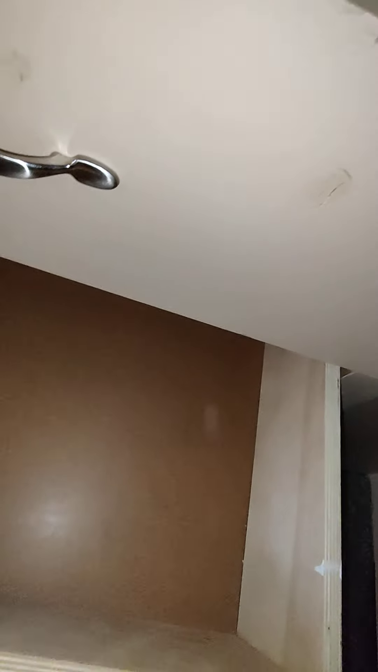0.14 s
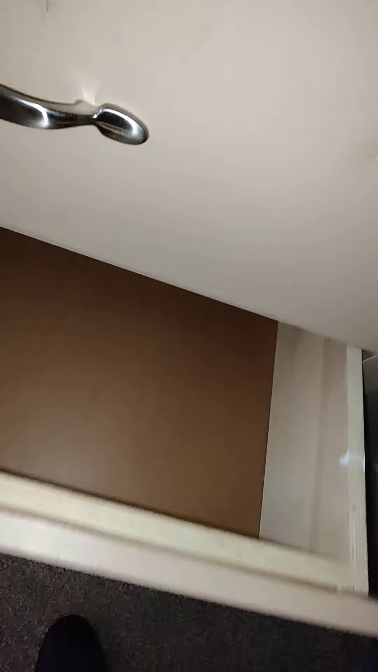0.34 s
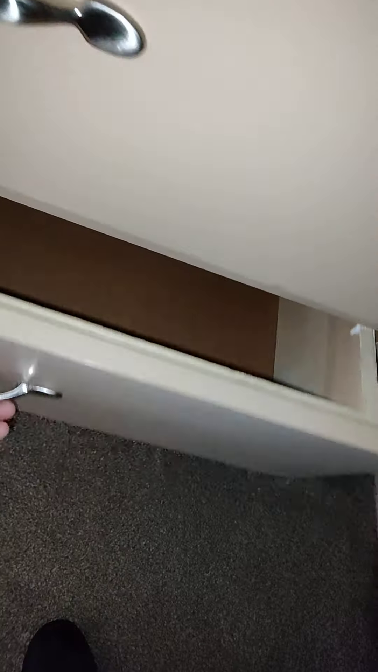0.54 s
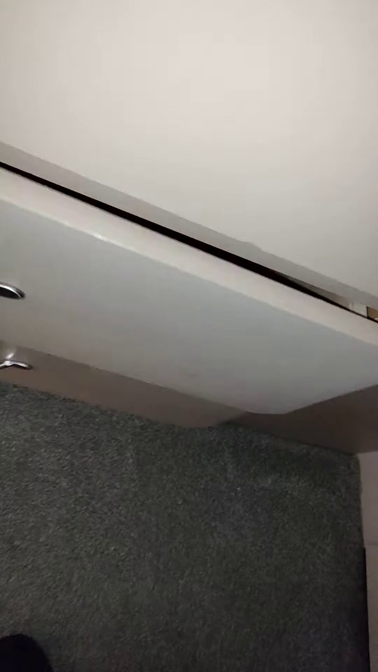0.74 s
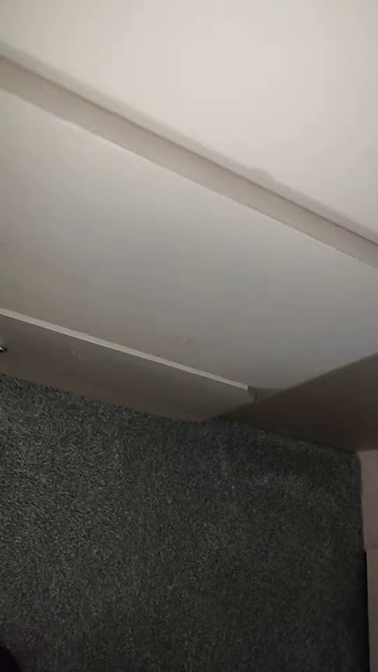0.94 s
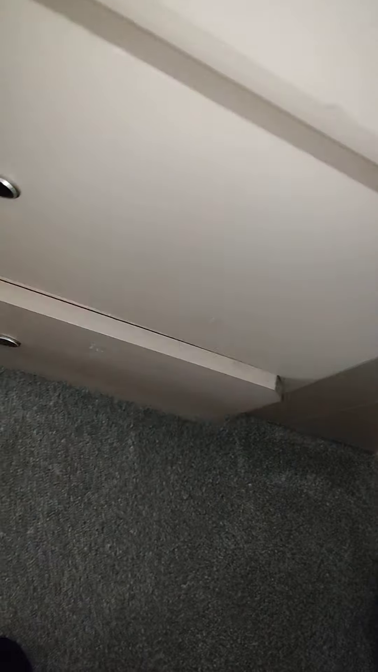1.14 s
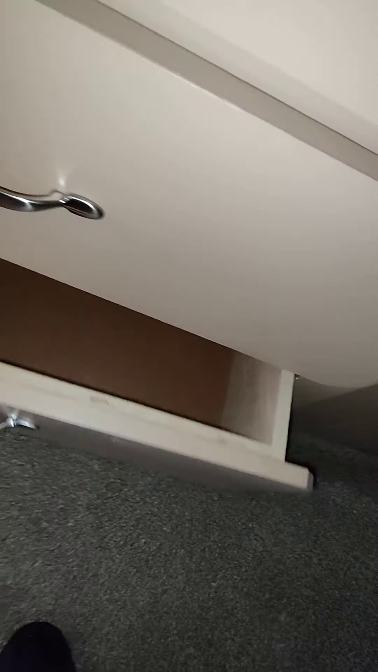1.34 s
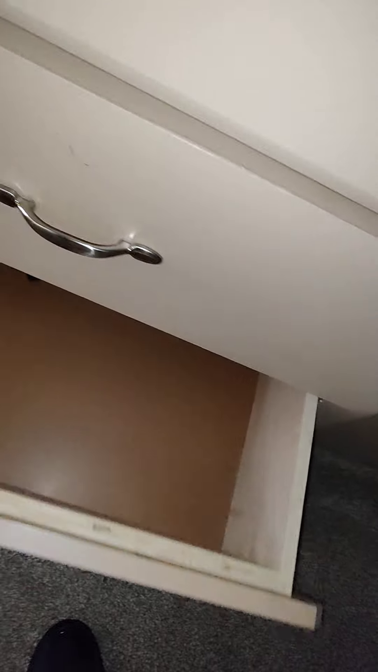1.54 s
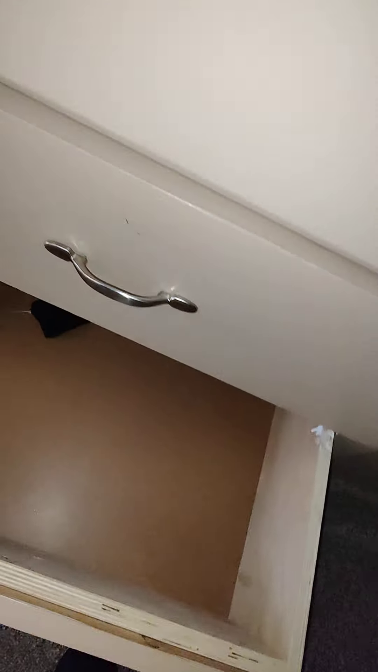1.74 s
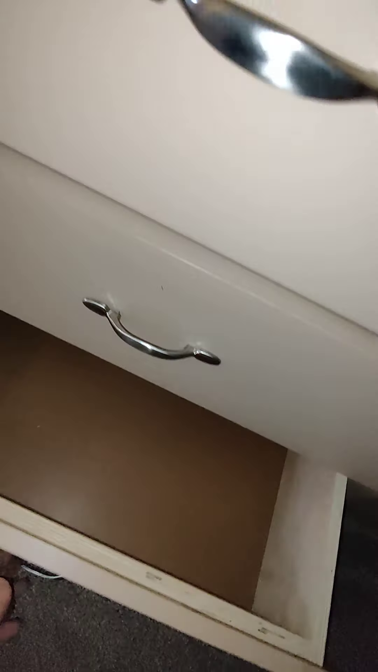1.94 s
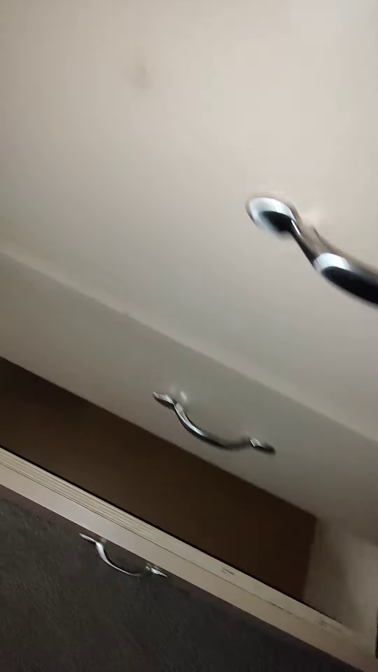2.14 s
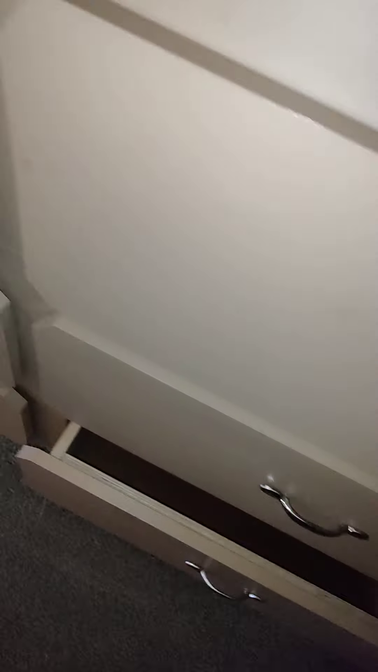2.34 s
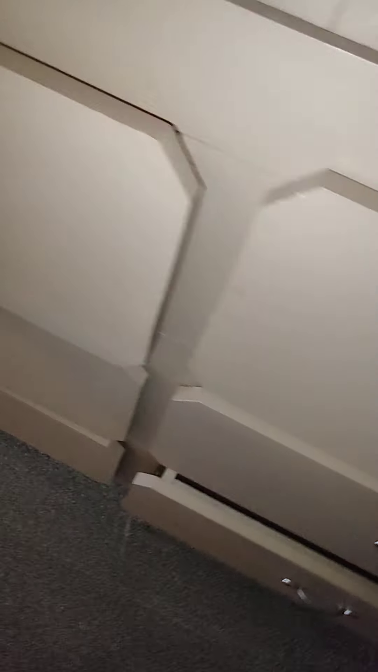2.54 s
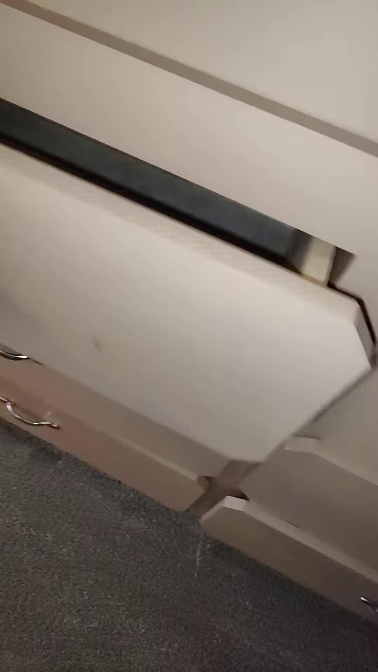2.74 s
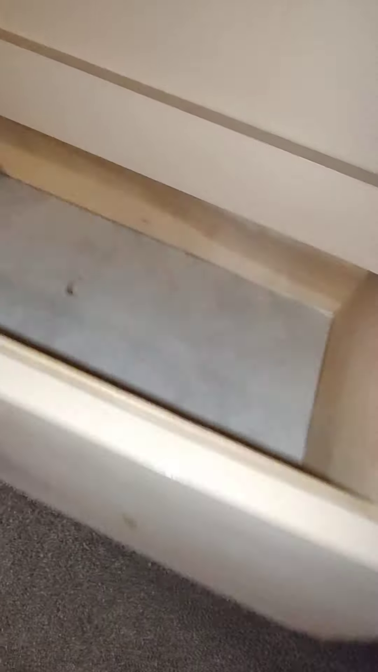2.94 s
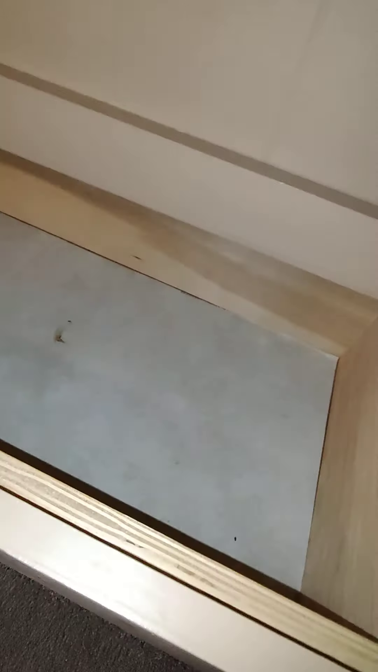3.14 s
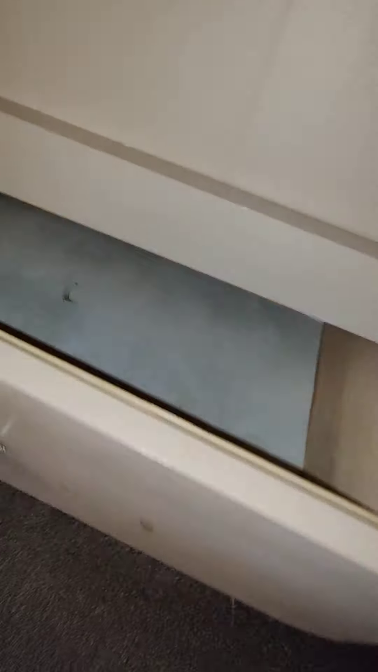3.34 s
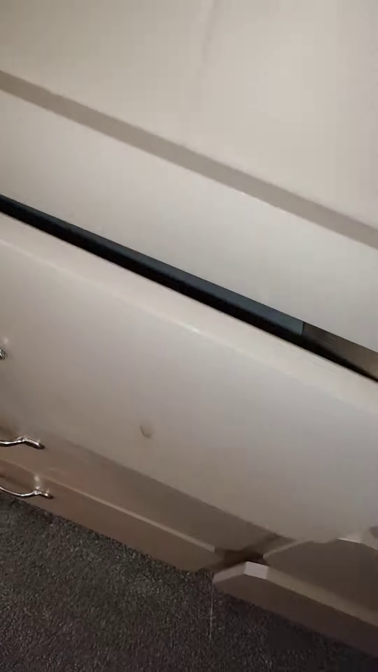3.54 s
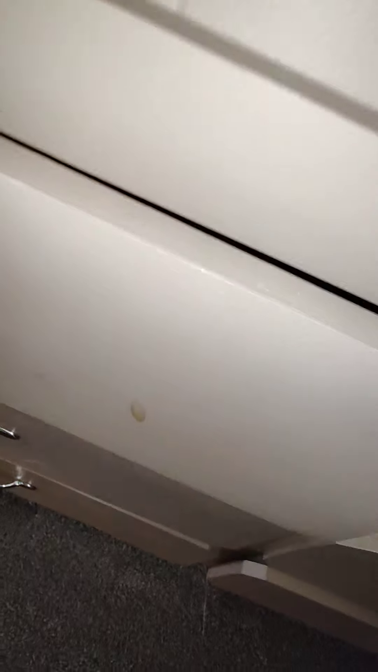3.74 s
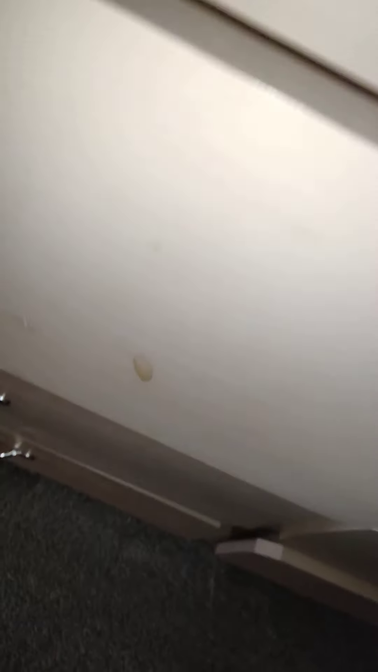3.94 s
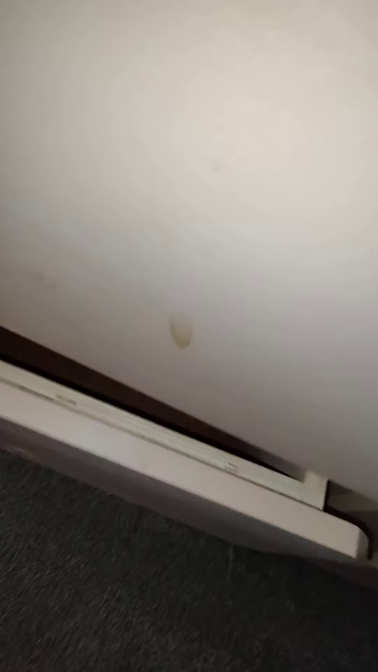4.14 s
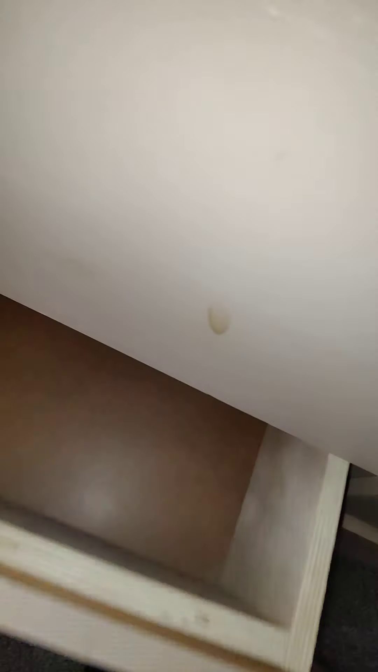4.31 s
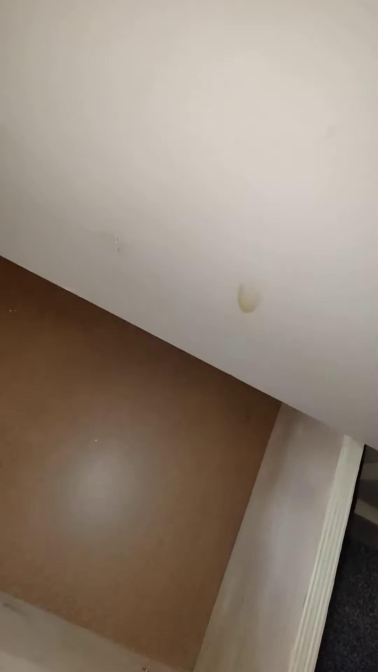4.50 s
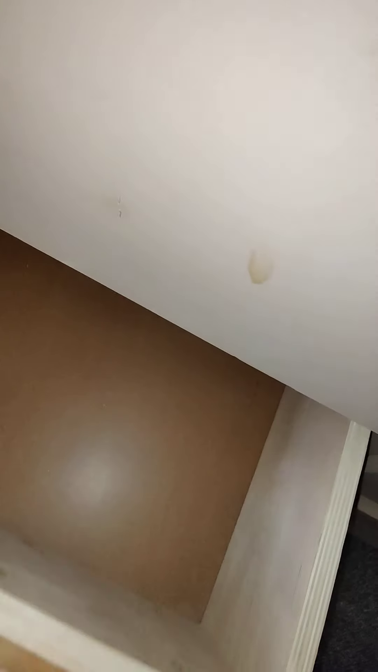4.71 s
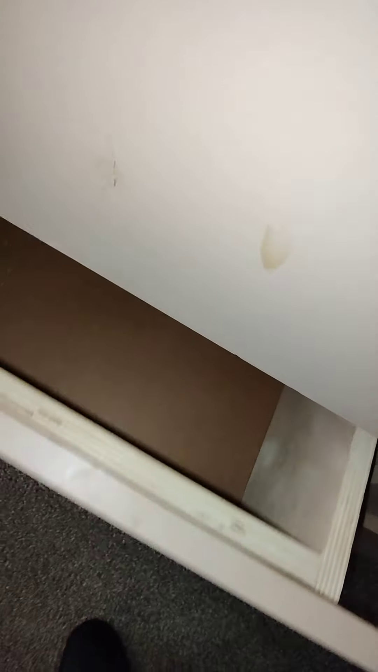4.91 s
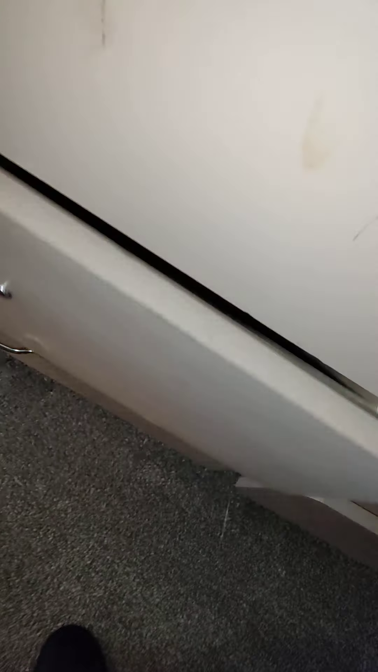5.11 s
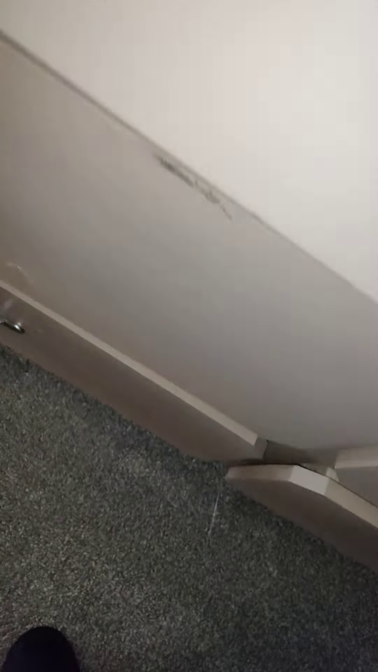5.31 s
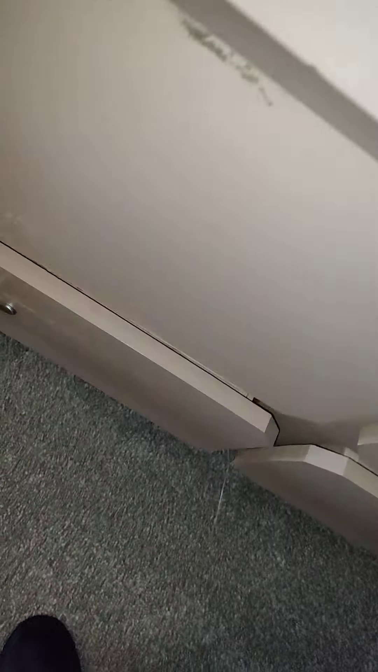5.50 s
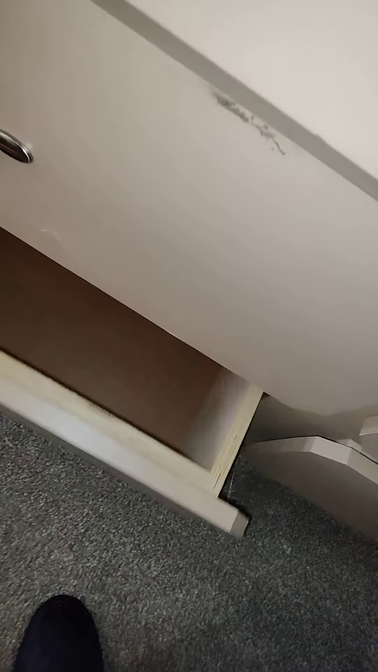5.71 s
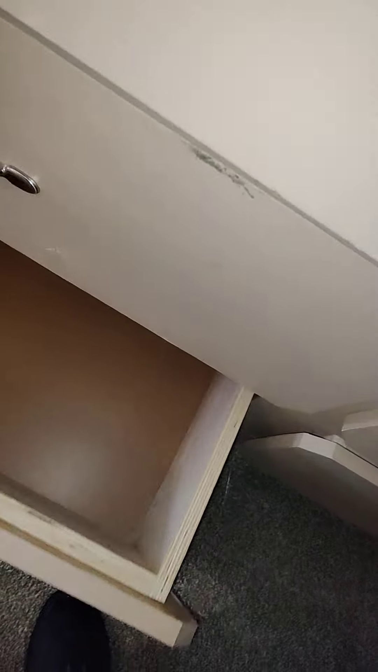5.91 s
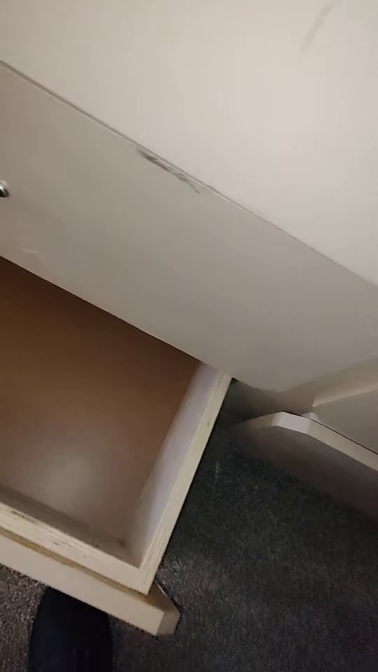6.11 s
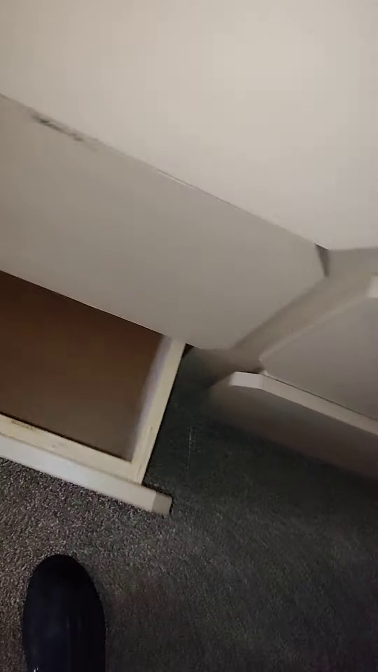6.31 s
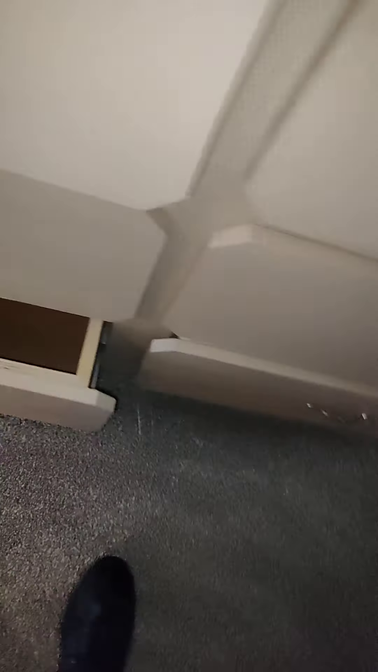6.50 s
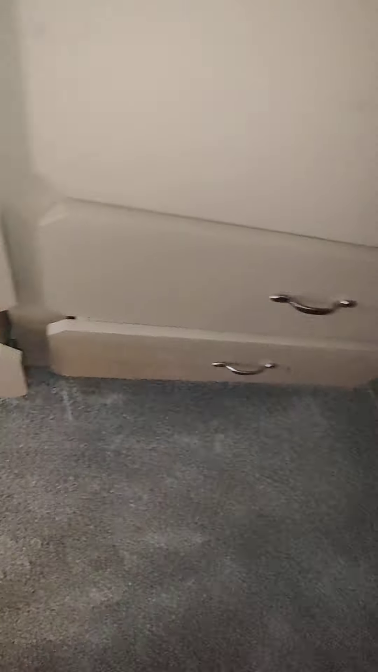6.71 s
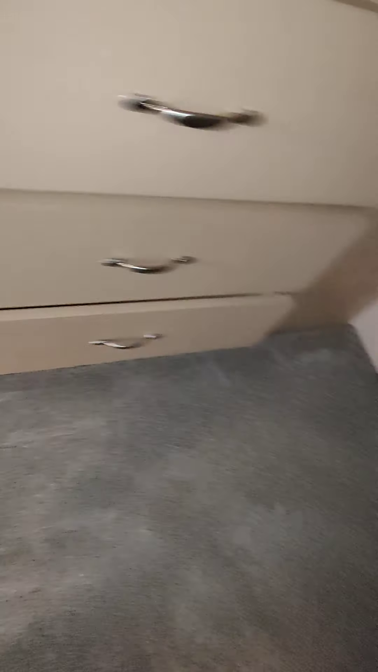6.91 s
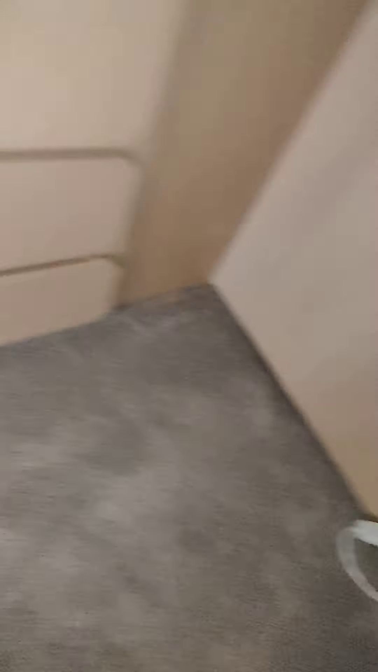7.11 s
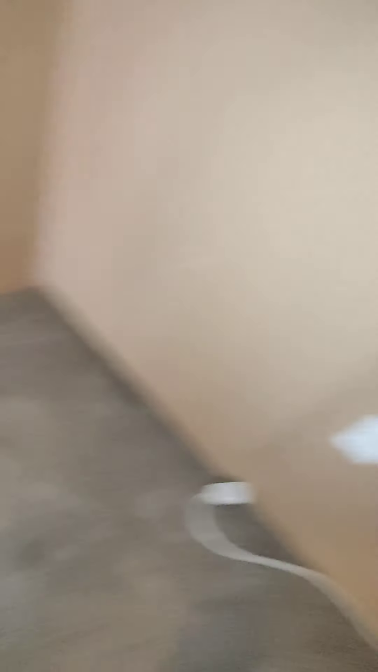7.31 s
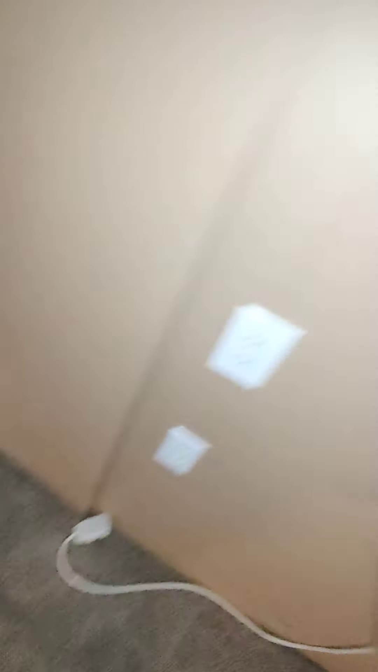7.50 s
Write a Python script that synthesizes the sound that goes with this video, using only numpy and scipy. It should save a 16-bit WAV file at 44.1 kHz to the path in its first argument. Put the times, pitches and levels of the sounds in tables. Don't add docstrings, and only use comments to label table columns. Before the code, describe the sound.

In a small, empty carpeted room, wooden dresser drawers are pulled out and pushed shut in quick succession. Runners rub with a grainy low rumble and dry rasp; each stop gives a hollow thud, wooden crack and short rattle. The hardest slam comes past the middle, followed by lighter slides and knocks, then quiet carpet scuffs. Close handheld stereo microphone with low handling sway.

```python
import sys
import numpy as np
from scipy import signal
from scipy.fft import rfft, irfft, next_fast_len
from scipy.io import wavfile

SR = 44100
rng = np.random.default_rng(int(sys.argv[2]) if len(sys.argv) > 2 else 0)


def ratio_of_db(decibels):
    return 10 ** (np.asarray(decibels, float) / 20)


def file_out(sig):
    cols = np.atleast_2d(sig).T
    lim = np.clip(cols, -1, 1)
    pcm = np.round(lim * 32767).astype(np.int16)
    wavfile.write(sys.argv[1], SR, pcm)


N = 332955
LEFT_LEAD_S, UNLIKE, LEFT_DB = 0.00013, 0.96, 2.5


def rms_one(x):
    return x / np.sqrt(np.mean(x ** 2) + 1e-20)


def drift(rate_hz):
    r = np.exp(-80 * np.pi * rate_hz / SR)
    noise = rng.standard_normal(N // 40 + 2002)
    slow = signal.lfilter([1], [1, -2 * r, r * r], noise)[2000:]
    return np.interp(np.arange(N) / 40, np.arange(len(slow)), rms_one(slow))


def resonate(x, hz, width_hz):
    r = np.exp(-np.pi * width_hz / SR)
    zeros = np.array([1, 0, -1]) * (1 - r * r) / 2
    return signal.lfilter(zeros, [1, -2 * r * np.cos(2 * np.pi * hz / SR), r * r], x)


def ring(x, hz, t60_s):
    y = resonate(x, hz, np.log(1000) / np.pi / max(t60_s, .005))
    return y / np.abs(y).max()


def coloured(x, spectrum, patchy_db):
    hz, db = np.transpose(spectrum)
    edges = np.geomspace(hz[0], min(hz[-1], .45 * SR), num=9)
    out, together = 0, drift(20.0)
    for k, (low, high) in enumerate(zip(edges, edges[1:])):
        band = signal.sosfilt(signal.butter(2, [low, high], "band", fs=SR, output="sos"), x[k % 2])
        level_db = np.interp(np.log(low * high) / 2, np.log(hz), db)
        out = out + band * ratio_of_db(level_db + patchy_db * (together + drift(21.6)))
    return rms_one(out)


def grains(per_s, spread_db):
    sizes = ratio_of_db(spread_db * np.minimum(rng.exponential(1, (2, N)), 5))
    sizes = sizes * rng.choice([-1, 1], (2, N))
    return sizes * (rng.random((2, N)) < per_s / SR) + 1e-18


def burst(t60_s, rise_s, noise):
    t = np.arange(len(noise)) / SR
    return noise * (1 - np.exp(-t / max(rise_s, 1e-4))) * ratio_of_db(-60 * t / max(t60_s, .005)) + 1e-18


def swell(start_s, peak_s, end_s):
    t = np.arange(max(start_s, 0), end_s, 1 / SR)
    phase = np.interp(t, [start_s, peak_s, max(end_s, peak_s + .01)], [0, 1, 0])
    return np.sin(np.pi / 2 * phase)


def add(out, s, sound):
    i = round(s * SR)
    out[..., i:i + sound.shape[-1]] += sound[..., :N - i]


def placed(x, pan_db, other=0, lead_s=LEFT_LEAD_S):
    t = np.arange(x.shape[-1])
    left = (x + other) * ratio_of_db(pan_db / 2)
    right = np.interp(t - lead_s * SR, t, x - other) * ratio_of_db(-pan_db / 2)
    return np.array([left, right])


# start t/s, fastest t/s, end t/s, rub
# level/dB, grit/dB
STROKES = [(-.05, 0.046, 0.22, -32, 4), (0.314, 0.452, 0.57, -34.5, -3.5), (0.43, 0.61, 0.88, -39, 8.5),
           (1.21, 1.6, 1.715, -35.5, 0.5), (1.894, 2.053, 2.505, -37.5, -5.5),
           (2.694, 2.89, 2.87, -40.5, -7), (2.83, 3.007, 2.94, -32.5, 4), (3.275, 3.393, 3.38, -35, -2),
           (3.33, 3.524, 3.59, -32.5, 2.5), (4.127, 4.293, 4.8, -41, 0.5), (4.24, 4.5, 4.59, -29.5, -4.5),
           (4.719, 4.884, 5.2, -31.5, -5.5), (4.94, 5.137, 6, -43, 2.5), (5.608, 5.76, 6, -35, -4.5),
           (5.73, 5.994, 6.1, -34.5, -3), (6.26, 6.453, 6.746, -41, 1.5), (6.583, 6.682, 7.13, -49.5, 14.5),
           (6.768, 7.168, 8.03, -54, 12.5), (0.747, 0.983, 1.33, -51.5, 19), (3.602, 3.782, 4.26, -54, 7.5),
           (2.282, 2.55, 5.3, -50.5, 11.5)]
# level re rub/dB, share of grit, steepness with speed, rest level/dB
LAYERS = [
    (-10, .1, 0.77, -53),
    (-1.03, 0.085, 0.97, -68),
    (-10.5, 0.25, 1, -81),
    (-16.5, 0.74, 1, -68),
    (-35, 1.08, 1, -75),
]


def motion():
    offset_db, grit_share, steepness, rest_db = np.transpose(LAYERS)[..., None]
    power = ratio_of_db(rest_db) ** 2 * np.ones(N)
    for start, peak, end, rub_db, grit_db in STROKES:
        level = ratio_of_db(rub_db + offset_db + grit_share * grit_db)
        add(power, max(start, 0), (level * swell(start, peak, end) ** steepness) ** 2)
    return np.sqrt(power)


# t/s, front level/dB, front f/Hz, thud level/dB, box level/dB
BASE_KNOCKS = [(0.201, -27, 223.5, -38, -38), (0.228, -32, 213, -45, -57),
               (0.975, -10.5, 226.5, -21.5, -29), (1.041, -25, 208, -32, -49),
               (1.157, -20.5, 200, -32, -28.5), (1.7, -26.5, 226, -51, -35), (1.766, -26, 208, -27, -40),
               (2.458, -30, 236, -59, -34.5), (2.966, -18.5, 181, -25, -23), (4.102, -32, 184, -36, -41),
               (5.3226, -7, 239.6, -15, -7.5), (5.44, -42, 225, -27, -53)]
# t/s, front level/dB, front f/Hz, thud level/dB, box level/dB
SIDE_KNOCKS = [(0.145, -23, 259.6, -26.5, -25.5), (0.708, -17, 209.4, -22, -19.5),
               (0.748, -20.5, 204, -23.5, -40), (0.946, -8.5, 225.2, -16.5, -17),
               (0.998, -29, 194, -17, -42), (2.598, -53, 210, -51, -32), (4.482, -16.5, 225, -21, -24),
               (4.541, -13.5, 229.3, -23, -28.5), (4.9, -4, 224.3, -19, -18.5), (4.929, -13, 210, -49, -49),
               (4.952, -33, 226, -44, -49), (5.349, -9.5, 279.6, -27, -18.5), (6.381, -29.5, 284, -37, -59)]
# t/s, front level/dB, front f/Hz, thud level/dB, box level/dB
BACK_KNOCKS = [(0.043, -22, 226, -39, -51), (0.116, -18, 254.7, -32, -26.5), (0.682, -13, 218.5, -37, -18),
               (0.797, -24.5, 240, -33, -33.5), (2.628, -26.5, 240.5, -64, -35),
               (2.648, -28.5, 234, -59, -30), (3.006, -28, 251, -22, -23), (3.018, -22.5, 245, -25.5, -27),
               (3.039, -16, 179.6, -26, -20), (3.512, -15, 195, -24, -17), (3.551, -27, 202, -37, -34),
               (3.625, -47, 204, -23.5, -28), (3.67, -28.5, 175, -28.5, -38), (4.589, -25, 230, -35, -29.5),
               (5.389, -33.5, 310, -26, -32), (5.998, -32, 203, -55, -28), (6.014, -21, 212, -53, -42),
               (6.09, -28.5, 252, -38.5, -37), (6.255, -22.5, 177.5, -41, -30)]
FLOOR_HZ, SIDE_HZ, BACK_HZ = 61, 86, 134.8


def all_knocks():
    knocked = [(FLOOR_HZ, BASE_KNOCKS), (SIDE_HZ, SIDE_KNOCKS), (BACK_HZ, BACK_KNOCKS)]
    return [(s, front_db, thud_hz, front_hz, thud_db, box_db)
            for thud_hz, rows in knocked
            for s, front_db, front_hz, thud_db, box_db in rows]


# start t/s, strongest t/s, end t/s, level/dB
LEANS = [
    (0.24, .55, 1.87, -37.5),
    (1.677, 1.783, 1.88, -36),
    (2.733, 2.997, 3.26, -28),
    (3.367, 3.54, 3.89, -33),
    (3.803, 4.3, 4.95, -39),
    (4.85, 5.25, 5.42, -38.5),
    (5.903, 6.077, 7, -44),
]
SHUDDER_DB, SHUDDER_T60_S = -17.5, 0.25


def shudder():
    out = np.zeros(N)
    for start, peak, end, db in LEANS:
        add(out, start, ratio_of_db(db) * swell(start, peak, end))
    for s, *_, thud_db, _ in all_knocks():
        add(out, s, ratio_of_db(thud_db + SHUDDER_DB) * burst(SHUDDER_T60_S, 0.0038, np.ones(SR // 2)))
    return out


# f/Hz, width/Hz, level/dB
RUMBLE = [(96.5, 4.5, 5.5), (135, 9.2, 5), (204, 2.9, 0), (251, 10.6, -6)]
# f/Hz, density level/dB
WOOD = [(130, -16), (220, 5), (296, -0.5), (396, -2.5), (456, 4.5), (800, -17.5), (1040, -53), (1760, -120)]
# f/Hz, density level/dB
PANEL = [(700, 4), (1000, -1), (1300, -1.5), (1600, -17)]
# f/Hz, density level/dB
RASP = [(820, -28), (1400, 1.5), (1520, -0.5), (2370, -1), (3540, -14), (5000, -21.5), (6500, -64),
        (11000, -120)]
# start t/s, end t/s, f/Hz, width/Hz, level/dB
SINGING = [(1.3, 1.88, 378, 47, -37.5), (1.35, 1.807, 623, 250, -39.5), (1.97, 2.4, 370, 45, -44.5),
           (1.97, 2.22, 770, 25, -44), (1.95, 2.3, 2000, 700, -56), (4.25, 4.78, 230, 4.75, -34.5),
           (4.22, 4.466, 1090, 200, -41.5), (4.76, 5.3, 1200, 350, -48), (4.75, 5.3, 2200, 660, -57),
           (1.3, 1.78, 1200, 460, -48.5), (4.22, 4.47, 1330, 130, -47.5), (0.33, 0.69, 1030, 600, -49),
           (4.8, 4.91, 2400, 340, -46.5), (4.86, 4.9, 3800, 600, -43), (4.74, 4.83, 242, 12, -36),
           (4.78, 5.2, 676, 71, -51), (4.24, 4.46, 676, 73, -41), (2.0, 2.4, 1160, 430, -58),
           (3.66, 3.74, 1120, 160, -52), (2.38, 2.62, 2420, 160, -59), (5.7, 6.116, 407, 128, -35.5),
           (1.35, 1.81, 1870, 210, -53.5), (5.68, 6.1, 2110, 260, -51.5), (4.25, 4.48, 2180, 198, -50),
           (6.28, 6.617, 412, 81, -38)]


def slides(carcass, wood, panel, rasp):
    bumps, slips = grains(900, 2.1), grains(1200, 2.6)
    rumble = sum(ratio_of_db(db) * resonate(bumps[k % 2], hz, width) for k, (hz, width, db) in enumerate(RUMBLE))
    rub = 0
    for gain, source, spectrum, unlike in [(wood, slips, WOOD, .25),
                                           (panel, slips[::-1], PANEL, .4),
                                           (rasp, grains(4000, 1.57), RASP, UNLIKE)]:
        layer = coloured(source, spectrum, patchy_db=1.8)
        rub = rub + gain * placed(layer, LEFT_DB, unlike * layer[::-1])
    t = np.arange(N) / SR
    for start, end, hz, width, db in SINGING:
        span = slice(round(start * SR), round(end * SR))
        stroke = np.sin(np.pi * (t[span] - start) / (end - start)) ** 0.42
        tone = resonate(resonate(slips[0, span], hz, width), hz, 3 * width)
        add(rub, start, placed(ratio_of_db(db) * stroke * rms_one(tone), LEFT_DB))
    return np.hypot(carcass, shudder()) * rms_one(rumble), rub


# f/Hz, level/dB
BOX = [(120, 7), (300, 14), (570, -0.5), (800, -56), (1500, -33)]
# t/s, peak level/dB, f/Hz
ROCKING = [(0.127, -19, 62.8), (0.694, -19, 57), (0.95, -11, 53.3), (0.997, -13, 61), (1.767, -14, 47.8),
           (2.494, -28, 20.1), (2.548, -22.5, 21.6), (2.961, -16, 43), (3.619, -37, 61), (4.089, -31, 44.6),
           (4.511, -17, 40), (5.326, -8.5, 64.2), (5.358, -10.5, 32.3), (6.113, -24.5, 61.34)]
# t/s, f/Hz, peak level/dB, t60/s
RINGS = [(0.699, 145, -25, 0.16), (0.946, 563, -19.5, 0.23), (0.948, 2540, -28, 0.033),
         (0.95, 1960, -30, 0.041), (0.989, 2300, -35, 0.03), (1.3, 2100, -48, 0.021),
         (1.127, 1444, -31, 0.014), (1.157, 700, -22, 0.0086), (1.158, 1410, -23, 0.03),
         (1.16, 2390, -33, 0.013), (1.4265, 770, -32, 0.037), (1.428, 2360, -34.5, 0.027),
         (1.8475, 710, -43, 0.02), (2.5715, 2450, -48, 0.034), (2.599, 2480, -42, 0.04),
         (2.599, 900, -30.5, 0.03), (2.602, 694, -30.5, 0.016), (2.622, 2240, -39, 0.02),
         (2.637, 2500, -37.5, 0.018), (2.638, 1390, -33, 0.044), (2.654, 1990, -35.5, 0.02),
         (2.666, 2500, -43, 0.018), (3.012, 2820, -5, 0.011), (3.021, 410, -12.5, 0.097),
         (3.507, 1480, -35, 0.02), (3.508, 617, -17.5, 0.092), (3.520, 1020, -33, 0.037),
         (4.039, 1193, -33.5, 0.038), (4.1334, 1182, -43, 0.11), (4.482, 606, -23, 0.1),
         (4.492, 134.7, -23, 0.26), (4.510, 680, -24.5, 0.06), (4.898, 770, -25, 0.034),
         (4.901, 560, -11.5, 0.1), (5.324, 135, -9, 0.064), (5.323, 380, -11, 0.12),
         (5.324, 552, -11.5, 0.12), (5.325, 2370, -4.5, 0.012), (5.326, 1157, -10.5, 0.014),
         (5.5177, 1016, -39.5, 0.043), (5.9955, 8250, -52, 0.35)]
THUD_T60_S, FRONT_T60_S, BOX_T60_S = 0.26, 0.2, 0.21


def knocks():
    out, size = np.zeros(N), SR // 4
    push = burst(0.02, 0.00072, np.ones(size))
    ladder_hz = np.geomspace(120, 1500, num=22)
    box_hz, box_level_db = np.transpose(BOX)
    soft = signal.butter(3, 1600, fs=SR, output="sos")
    for s, front_db, thud_hz, front_hz, thud_db, box_db in all_knocks():
        chatter = signal.sosfilt(soft, burst(0.14, 0.0003, rng.standard_normal(size)))
        sound = ratio_of_db(thud_db + 8.0) * ring(push, thud_hz, THUD_T60_S)
        sound += ratio_of_db(front_db) * ring(push + 0.14 * chatter, front_hz, FRONT_T60_S)
        luck = rng.standard_normal((22, 2))
        modes_hz = ladder_hz * (1 + 0.0795 * luck[:, 0])
        modes_db = np.interp(np.log(modes_hz), np.log(box_hz), box_level_db) + 3 * luck[:, 1]
        box = sum(ratio_of_db(db) * ring(chatter, hz, BOX_T60_S * (400 / hz) ** 1.05)
                  for hz, db in zip(modes_hz, modes_db))
        add(out, s, sound + ratio_of_db(box_db + 3.0) * box / np.abs(box).max())
    out = signal.sosfilt(signal.butter(2, 30, "high", fs=SR, output="sos"), out)
    for s, peak_db, hz in ROCKING:
        add(out, s, ratio_of_db(peak_db) * ring(burst(0.044, 0.0054, np.ones(2 * size)), hz, 0.35))
    for s, hz, peak_db, t60 in RINGS:
        tap = resonate(burst(0.026, 0.000086, rng.standard_normal(size)), hz, hz / 2)
        pair = ring(tap, hz, t60) + 0.12 * ring(tap, 1.08 * hz, 0.57 * t60)
        add(out, s, ratio_of_db(peak_db) * pair / np.abs(pair).max())
    return out


# t/s, f/Hz, peak level/dB, t60/s
THUMPS = [(0.12, 125, -23, 0.055), (0.15, 81, -22, 0.091), (1.1967, 190, -30, .05),
          (3.5127, 156, -14.5, 0.19), (3.623, 350, -26, 0.053), (3.8, 145, -19.5, .1),
          (4.48, 105, -11, 0.18), (4.4, 46, -11.5, 0.11), (4.543, 89, -17, 0.16), (4.903, 95, -16, 0.23),
          (4.925, 205, -9.5, 0.21), (4.98, 100, -16, 0.071), (5.323, 198, -5.5, .1), (1.8, 170, -29, .12),
          (1.845, 147, -28, .08), (5.36, 220, -16, .08), (5.346, 93, -11, 0.13), (5.6, 135, -20, .1),
          (6.199, 330, -35, .1), (3.329, 144, -27.5, 0.13), (3.921, 210, -39, .2), (0.95, 333, -14, 0.072),
          (0.7, 380, -21, 0.094), (5.33, 424, -18, .1), (5.07, 65, -32, 0.17)]


def thumps():
    out = np.zeros(N)
    for s, hz, peak_db, t60 in THUMPS:
        add(out, s, ratio_of_db(peak_db) * ring(burst(1.94 / hz, 0.28 / hz, np.ones(SR // 3)), hz, t60))
    return out


# t/s, peak level/dB, ring f/Hz, top level/dB, t60/s
CRACKS = [(0.0837, -22, 2400, -8.5, 0.12), (0.1083, -15.5, 2230, -6, 0.2), (0.1552, -31, 2000, -4, 0.35),
          (0.647, -35.5, 1310, -1.5, 1), (0.6826, -17, 1271, -10, 0.23), (0.7036, -13.5, 1050, -11, 0.14),
          (0.949, -27, 1100, -21, 0.14), (1.7572, -29.5, 1230, -8.5, 0.16), (1.772, -29, 1190, -6, 0.083),
          (2.625, -37, 2030, -17, 0.13), (2.639, -33.5, 2300, -14, 0.63), (2.762, -31.5, 1000, -11.5, 0.2),
          (3.009, -9, 3180, -7, 0.14), (3.027, -13.5, 3040, -25, 0.29), (3.5061, -12.5, 2400, -13.5, 0.067),
          (3.5242, -24, 1000, -29, 0.15), (3.629, -34.5, 1350, -23, 0.33), (4.4805, -13, 1340, -10.5, 0.27),
          (4.5069, -15.5, 990, -9, 0.24), (4.5385, -28.5, 1210, 0, 0.16), (4.8972, -16, 1040, -11, 0.19),
          (5.313, -27.5, 2490, -17, 0.08), (5.3231, -12, 1310, -22, 0.18), (5.3253, -4, 3480, -18.5, 0.027),
          (5.3405, -18, 2500, -9.5, 0.14), (5.992, -23.5, 1040, -18, 0.23),
          (6.256, -37.5, 2370, -15, 0.036)]
# t/s, peak level/dB, ring f/Hz
TICKS = [(0.795, -26.5, 1330), (0.9331, -25, 1480), (0.9648, -28.5, 960), (1.126, -39, 1440),
         (1.158, -34, 1110), (1.427, -33, 2280), (1.847, -63, 1500), (1.969, -50, 900), (2.599, -47, 940),
         (3.2594, -41, 1190), (4.002, -39.5, 1740), (4.0394, -44, 1240), (4.1089, -27, 3050),
         (4.1306, -32.5, 1250), (5.5155, -38, 1560), (5.667, -57, 890), (5.935, -52, 1130),
         (6.376, -44, 1000), (6.428, -45, 2150)]
TICK_TOP_DB, TICK_T60_S = -18, 0.1


def cracks():
    out = np.zeros((2, N))
    broad = signal.butter(3, [700, 4600], "band", fs=SR, output="sos")
    top = signal.butter(2, [4000, 12500], "band", fs=SR, output="sos")
    ticks = [(*row, TICK_TOP_DB, TICK_T60_S) for row in TICKS]
    for s, peak_db, hz, top_db, t60 in CRACKS + ticks:
        noise = rng.standard_normal((2, SR // 4))
        contact = np.array([burst(0.05, 0.00025, part) + .5 * burst(t60, 0.0019, part) for part in noise])
        wide, high = signal.sosfilt(broad, contact), signal.sosfilt(top, contact)
        mix = 0.45 * np.array([ring(part, hz, 0.004) for part in wide])
        mix += 0.71 * wide / np.abs(wide).max()
        mix += ratio_of_db(top_db) * high / np.abs(high).max()
        sound, other = ratio_of_db(peak_db) * mix
        add(out, s - .001, placed(sound, 1.3, 0.57 * other))
    return out


# t/s, peak level/dB
SNAPS = [(0.829, -40.5), (1.6282, -47), (1.7944, -39), (1.8004, -45), (1.81, -45), (1.8367, -51),
         (1.8627, -49), (2.8484, -55), (2.8739, -54.5), (3.3074, -48), (3.384, -44), (4.242, -49),
         (4.6818, -49), (4.6942, -49), (4.8713, -49), (5.7205, -56), (5.7735, -54), (5.7962, -45),
         (7.2252, -45)]
SNAP_T60_S, SNAP_DB = 0.016, -1


def snaps():
    out = np.zeros((2, N))
    bright = signal.butter(2, [4500, 15500], "band", fs=SR, output="sos")
    for s, peak_db in SNAPS:
        click = signal.sosfilt(bright, burst(SNAP_T60_S, 0.00043, rng.standard_normal(SR // 20)))
        add(out, s - .001, placed(ratio_of_db(peak_db + SNAP_DB) * click / np.abs(click).max(), 4.5))
    return out


ROOM_T60_S, WALL_CUT_HZ, ROOM_DB = 0.21, 8300, -13


def room(x):
    size = next_fast_len(N + SR)
    w = 2 * np.pi * np.arange(size // 2 + 1) / size
    dull = 1 / (1 + 1j * w * SR / (2 * np.pi * WALL_CUT_HZ))
    response = np.zeros((2, len(w)), complex)
    for k, lag_s in enumerate(rng.uniform(.006, .028, 16)):
        loop = ratio_of_db(-60 * lag_s / ROOM_T60_S) * dull * np.exp(-1j * w * lag_s * SR)
        response[k % 2] += loop / (1 - loop) * (-1) ** (k // 2)
    thin = signal.sosfilt(signal.butter(2, 300, "high", fs=SR, output="sos"), x)
    return irfft(response * rfft(thin, size), size)[:, :N]


# f/Hz, density level/dB
SCUFF = [(1180, -36), (2000, -6), (2740, -13), (3260, 3.5), (5300, -5.5), (7120, -4), (9920, -4),
         (16000, -21)]
# start t/s, strongest t/s, end t/s, level/dB, edge level/dB
SCUFFS = [
    (2.437, 2.463, 2.6, -64, 8),
    (6.574, 6.7, 7, -48, -18),
    (7.02, 7.11, 7.5, -58, -8),
    (7.2, 7.313, 7.39, -58.5, 5.5),
    (7.517, 7.555, 7.6, -58, -2.5),
]


def scuffs():
    pile = coloured(grains(9000, 3.5), SCUFF, patchy_db=1.0)
    pile = np.array([pile, pile[::-1]])
    edge = 2 * resonate(resonate(pile, 13700, 3000), 14200, 3000)
    out = np.zeros((2, N))
    for start, peak, end, db, edge_db in SCUFFS:
        i = round(start * SR)
        drag = swell(start, peak, end)[:N - i]
        span = slice(i, i + len(drag))
        add(out, start, ratio_of_db(db) * drag * (pile[:, span] + ratio_of_db(edge_db) * edge[:, span]))
    return out


# f/Hz, density level/dB
AIR = [(1180, -37), (2000, -30), (2500, -5.5), (3170, 3.5), (4490, -9.5), (7120, -5.5), (9740, -14.5),
       (16000, -12.5)]
# start t/s, strongest t/s, end t/s, level/dB
SWISHES = [
    (2.89, 3.086, 3.32, -64.5),
    (3.5, 3.686, 3.96, -67),
    (6.1, 6.7, 8.5, -68),
    (1.92, 2.1, 3.06, -71),
]


def rustle(air):
    hiss = coloured(rng.standard_normal((2, N)), AIR, patchy_db=.35)
    power = air ** 2
    for start, peak, end, db in SWISHES:
        add(power, start, (ratio_of_db(db) * swell(start, peak, end) ** 0.63) ** 2)
    return ratio_of_db(8.0) * np.sqrt(power) * np.array([hiss, hiss[::-1]])


# t/s, level/dB
SWAY = [(0.0, -32), (0.6, -40), (0.92, -31), (1.17, -29), (1.58, -43.5), (1.98, -33.5), (2.25, -45),
        (2.93, -30.5), (3.2, -42), (3.64, -30.5), (4.12, -49), (4.58, -34.5), (5.32, -42.5), (5.47, -31),
        (5.66, -36), (7.02, -46.5), (7.3, -35), (7.55, -41.5)]
TURN_S, TURN_PAN_DB = 7.0, -13


def sway():
    band = signal.butter(2, [18, 60], "band", fs=SR, output="sos")
    low = signal.sosfilt(band, rng.standard_normal((2, N + SR)))[:, SR:]
    mid, side = low / low.std()
    t = np.arange(N) / SR
    pan_db = np.interp(t, [TURN_S, TURN_S + 0.056], [3.0, TURN_PAN_DB])
    level_db = np.interp(t, *np.transpose(SWAY))
    common = mid * ratio_of_db(pan_db * [[.5], [-.5]])
    return ratio_of_db(level_db) * (common + 0.26 * side * np.array([[1], [-1]]))


def scene():
    *wood, air = motion()
    rumble, rub = slides(*wood)
    body = placed(rumble + knocks() + thumps(), 3.66, lead_s=.00007)
    dresser = body + rub + cracks()
    reverb = ratio_of_db(ROOM_DB) * room(dresser.mean(axis=0))
    return dresser + reverb + snaps() + scuffs() + rustle(air) + sway()


def roll_off(x):
    return signal.sosfilt(signal.butter(12, 15800, fs=SR, output="sos"), x)


# f/Hz, width/Hz, level/dB
LEFT_PORT = [(844, 590, -10.5), (5570, 3500, -9.5)]
# f/Hz, width/Hz, level/dB
RIGHT_PORT = [(2300, 510, -6), (14000, 2000, -13)]
PORT_HZ, PORT_WIDTH_HZ, PORT_DB = 7000, 1100, 3
CEILING, CUTOFF_HZ = .88, 16450


def record(dry):
    x = (dry + ratio_of_db(PORT_DB) * resonate(dry, PORT_HZ, PORT_WIDTH_HZ)) / CEILING
    for port, peaks in enumerate([LEFT_PORT, RIGHT_PORT]):
        x[port] += sum(ratio_of_db(db) * resonate(x[port], hz, width) for hz, width, db in peaks)
    x = CEILING * x / (1 + x ** 6) ** (1 / 6)
    x = signal.sosfilt(signal.cheby2(12, 60, CUTOFF_HZ, fs=SR, output="sos"), x)
    return roll_off(x)


dry = scene()
out = record(dry)
file_out(out)
```